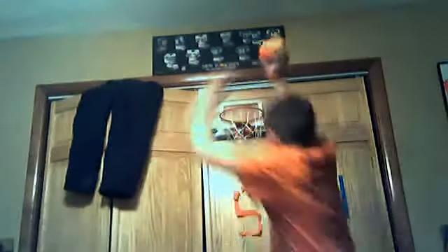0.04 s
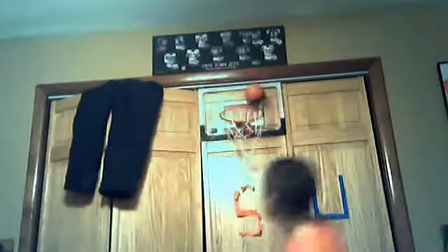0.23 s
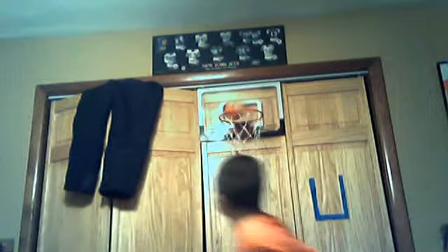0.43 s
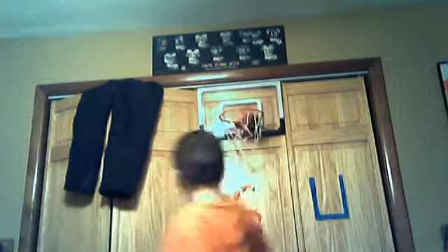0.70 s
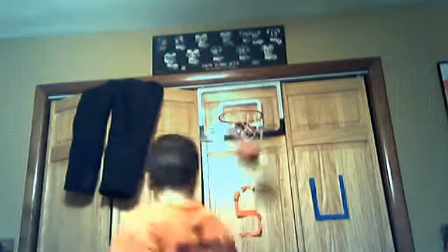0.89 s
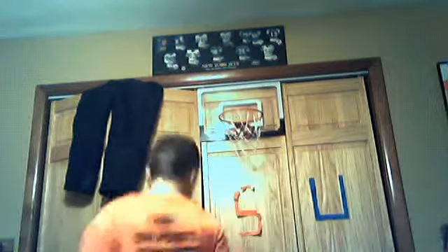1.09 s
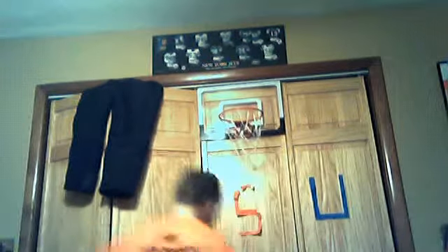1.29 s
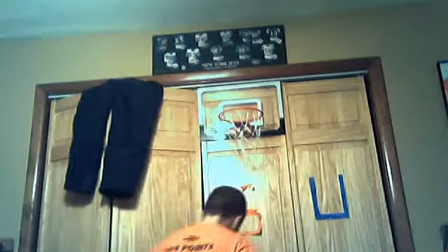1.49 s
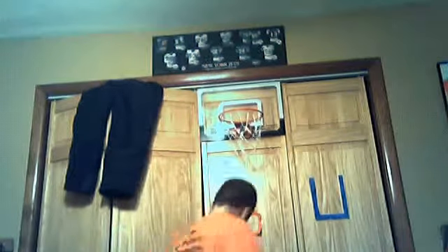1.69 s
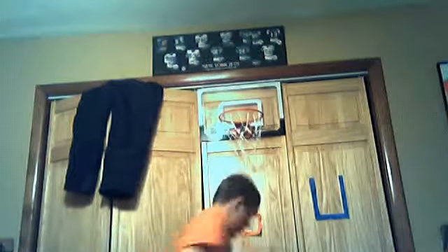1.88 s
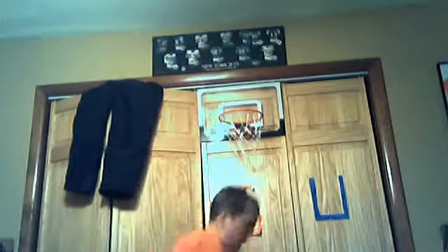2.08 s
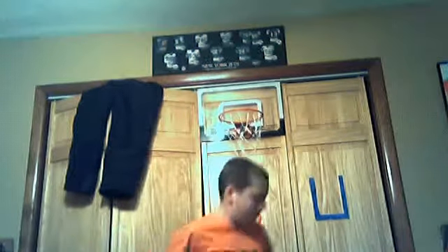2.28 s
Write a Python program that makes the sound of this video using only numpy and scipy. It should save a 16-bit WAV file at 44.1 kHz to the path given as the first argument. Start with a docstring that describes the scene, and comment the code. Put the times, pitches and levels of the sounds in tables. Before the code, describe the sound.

A loud bang comes first as a ball hits a backboard on a door, which rattles briefly with the loose rim. The net brushes faintly, then bounces and footsteps thud softly in a small room with a faint hum.

```python
"""First comes a bang: a small ball hits a mini hoop's backboard, the closet door behind it slams in its
frame and rattles, and the loose rim buzzes. The ball brushes through the net, then bounces and footsteps
thud softly on the floor of a small room. A faint hum lies under it all, and the microphone overloads
a little on the bang."""
import sys
import numpy as np
from scipy import signal
from scipy.fft import rfft, irfft
from scipy.io import wavfile

SR = 44100
rng = np.random.default_rng(int(sys.argv[2]) if len(sys.argv) > 2 else 0)


def transcribe(signal):
    """Save signal, clipped to [-1, 1], as a 16-bit WAV file at the path in sys.argv[1]."""
    frames = np.atleast_2d(signal).T
    limited = np.clip(frames, -1, 1)
    pcm = np.round(limited * 32767).astype(np.int16)
    wavfile.write(sys.argv[1], SR, pcm)


N = 108045
HIT_RISE_S = .0007  # how fast a ball or foot contact builds


def undb(db):
    """Turn decibels into a gain."""
    return 10 ** (np.asarray(db) / 20)


def unit(x):
    """Scale a sound to an average (rms) level of 1."""
    return x / np.sqrt(np.mean(x ** 2))


def on_log(hz, points):
    """Read between (Hz, value) points, giving each octave equal space."""
    pitches, values = np.array(points, float).T
    return np.interp(np.log(np.maximum(hz, 1)), np.log(pitches), values)


def colour(x, points):
    """Give a sound the tone of a (Hz, dB) curve; only the curve's shape counts."""
    gain = unit(undb(on_log(np.arange(N + 1) * SR / (2 * N), points)))
    cepstrum = irfft(np.log(gain))
    cepstrum[1:N] *= 2  # folded so that nothing sounds before its hit
    cepstrum[N + 1:] = 0
    return irfft(rfft(x, 2 * N) * np.exp(rfft(cepstrum)))[:N]


def band(x, centre_hz, half_width_hz):
    """A resonance: keep only the sound near one pitch."""
    edges = [centre_hz - half_width_hz, centre_hz + half_width_hz]
    return signal.sosfilt(signal.butter(2, edges, "bandpass", fs=SR, output="sos"), x)


def since(start):
    """Seconds since a moment, zero before it."""
    return np.maximum(np.arange(N) / SR - start, 0)


def fade(t, t60):
    """Die away by 60 dB in t60 seconds, the fade time."""
    return np.exp(-np.log(1000) * t / t60)


def swell(middle, half):
    """A smooth rise and fall, about a third as strong half seconds from its middle."""
    return np.exp(-((since(0) - middle) / half) ** 2)


def uneven(depth):
    """A gain that jumps about from one millisecond to the next."""
    steps = np.arange(0, N, SR // 1000)
    return np.exp(depth * np.interp(np.arange(N), steps, rng.standard_normal(len(steps))))


def burst(start, rise_s, t60, chatter=0):
    """A spray of tiny contacts that builds and dies, with energy 1; chatter roughens it."""
    t = since(start)
    spray = rng.standard_normal(N) * uneven(chatter) * (1 - np.exp(-t / rise_s)) * fade(t, t60)
    return spray / np.sqrt(np.sum(spray ** 2))


# The tone of the room's air. Each row: pitch in Hz, level in dB.
AIR_TONE = [(25, 1.5), (60, -7.5), (130, -11.5), (200, -10), (320, -15), (600, -17), (900, -17.5),
            (1800, -25.5), (3000, -31), (6800, -29), (8000, -36)]

def background(air_db=-70.5, hum_db=-66.5, hum_hz=90):
    """Quiet room air and a steady low hum."""
    air = unit(colour(rng.standard_normal(N), AIR_TONE))
    hum = np.sqrt(2) * np.sin(2 * np.pi * hum_hz * since(0))
    return undb(air_db) * air + undb(hum_db) * hum


# How long the room echoes. Each row: pitch in Hz, fade time in seconds.
ROOM_FADES = [(150, .42), (500, .27), (1200, .36), (2700, .39), (6000, .28)]

def room(x, build_s=.008):
    """The echo of a small room; the bass lingers longest."""
    t, hz = since(0), np.arange(N // 2 + 1) * SR / N
    noise, tail = rfft(rng.standard_normal(N)), 0
    for k, (_, t60) in enumerate(ROOM_FADES):
        share = on_log(hz, [(f, j == k) for j, (f, _) in enumerate(ROOM_FADES)])
        tail = tail + irfft(noise * share, N) * fade(t, t60)
    walls = signal.butter(2, (70, 5000), "bandpass", fs=SR, output="sos")  # the range they reflect
    tail = signal.sosfilt(walls, tail * (1 - np.exp(-t / build_s)))
    return signal.fftconvolve(x, tail / np.sqrt(np.sum(tail ** 2)))[:N]


# Faint scrapes. Each row: middle in seconds, half-length in seconds, level in dB.
SCUFFS = [(1.486, 0.042, -71.5), (1.616, 0.069, -72)]
# Their resonances. Each row: pitch in Hz, relative level in dB.
SCUFF_RINGS = [(1880, -0.5), (2200, -5), (2670, -7.5)]

def scuffs():
    """Two short grainy scrapes after the first bounce."""
    grains = rng.standard_normal(N) * uneven(.41)
    scrape = unit(sum(undb(db) * band(grains, hz, half_width_hz=96) for hz, db in SCUFF_RINGS))
    return scrape * sum(undb(db) * swell(middle, half) for middle, half, db in SCUFFS)


# Light brushes. Each row: middle and half-length in seconds, level in dB, pitch in Hz, width in octaves.
RUSTLES = [(0.812, 0.043, -61, 833, 0.89), (0.821, 0.053, -69, 5770, 0.46),
           (1.463, 0.0437, -76, 5900, 0.23), (1.677, 0.015, -69.5, 597, 0.18),
           (1.92, 0.084, -81.5, 1311, 0.57), (2.302, 0.086, -77.5, 1940, 0.2)]

def rustles():
    """Net, clothes and feet brush with a faint hiss."""
    out, hz = 0, np.arange(1, N // 2 + 2) * SR / N
    for middle, half, db, centre_hz, octaves in RUSTLES:
        tone = np.exp(-.5 * (np.log2(hz / centre_hz) / octaves) ** 2)
        hiss = unit(irfft(rfft(rng.standard_normal(N)) * tone, N))
        out = out + undb(db) * swell(middle, half) * hiss
    return out


# Shifts of weight. Each row: middle in seconds, half-length in seconds, level in dB.
WEIGHT_SHIFTS = [(0.18, 0.047, -45), (0.601, 0.1, -44.5), (0.873, 0.068, -39), (1.315, 0.015, -56),
                 (1.39, 0.073, -37), (2.221, 0.038, -37)]
# The rumble's tone. Each row: pitch in Hz, level in dB.
RUMBLE_TONE = [(15, -16.5), (27, 6.5), (45, -12.5), (65, -11.5), (130, -21), (300, -38.5), (1000, -79)]

def floor_rumble():
    """The floor rumbles deeply as weight shifts on it."""
    rumble = unit(colour(rng.standard_normal(N), RUMBLE_TONE))
    return rumble * sum(undb(db) * swell(middle, half) for middle, half, db in WEIGHT_SHIFTS)


# The notes of backboard and door. Each row: pitch in Hz, relative level in dB, fade time in seconds.
PANEL_NOTES = [(200, -23, .22), (260, -25, .18), (345, -25, .18), (510, -10, .17), (560, -7, .16),
               (587, -1.5, .19), (657, -8, .14), (711, -15, .16), (854, -16, .14), (955, -18, .14),
               (1100, -17, .13), (1510, -21, .12)]
# The loudest note shifts as the door presses on its frame and comes free.
# Each row: time in seconds, pitch in Hz.
PANEL_PITCH = [(.24, 630), (.243, 587), (.42, 587), (.44, 608)]

def panel_ring(blows, rise_s, gain_db=-3.5):
    """Backboard and door ring after each (seconds, dB) blow, sped up to that moment's pitch."""
    out, t = 0, since(0)
    loudest_hz = max(PANEL_NOTES, key=lambda note: note[1])[0]
    ring = sum(undb(db) * np.sin(2 * np.pi * hz * t) * fade(t, t60) for hz, db, t60 in PANEL_NOTES)
    ring *= 1 - np.exp(-t / rise_s)
    for start, db in blows:
        speed = np.interp(start, *np.transpose(PANEL_PITCH)) / loudest_hz
        out = out + undb(gain_db + db) * np.interp((t - start) * speed, t, ring, left=0)
    return out


# Bounces and footsteps. Each row: start in seconds, boom in dB, thump in dB, thump pitch in Hz,
# slap in dB, slap's treble limit in Hz, tick in dB, door ring in dB. Levels are relative.
THUDS = [(0.885, -53.5, -56.5, 198, -18, 850, -48, -77), (1.2954, -55, -54.5, 147, -19, 500, -51, -71.5),
         (1.3449, -21.5, -21.5, 172.8, 3, 460, -28, -40), (2.1631, -20, -37, 213, 6, 678, -32, -43)]
# The tones of the dull slap and the brighter tick. Each row: pitch in Hz, level in dB.
SLAP_TONE = [(100, 5), (300, -3.5), (560, 1.5), (680, -4), (840, -4.5), (1000, -9.5)]
TICK_TONE = [(300, -8), (1000, 11.5), (1700, 6.5), (2500, -4.5), (4000, -5), (6800, -4), (8000, -9.5)]

def thuds(boom_hz=89.45, boom_peak_s=.02, echo_db=-17):
    """A soft contact slaps and thumps, the floor's boom swells behind it, and the door rings faintly."""
    low, slaps, ticks = 0, 0, 0
    for start, boom_db, thump_db, thump_hz, slap_db, limit_hz, tick_db, _ in THUDS:
        t = since(start)
        age = t / boom_peak_s
        boom = (age * np.exp(1 - age)) ** 3.95  # a rounded pulse
        boom += undb(-6) * np.minimum(age, 1) * fade(t, .28)  # and its tail
        thump = (1 - np.exp(-t / HIT_RISE_S)) * fade(t, .156)
        low = low + undb(boom_db) * boom * np.sin(2 * np.pi * boom_hz * t)
        low = low + undb(thump_db) * thump * np.sin(2 * np.pi * thump_hz * t)
        soften = signal.butter(6, limit_hz, fs=SR, output="sos")
        slaps = slaps + undb(slap_db) * signal.sosfilt(soften, burst(start, HIT_RISE_S, t60=.15))
        ticks = ticks + undb(tick_db) * burst(start, HIT_RISE_S, t60=.31)
    ring = panel_ring([(start, db) for start, *_, db in THUDS], HIT_RISE_S)
    contact = colour(slaps, SLAP_TONE) + colour(ticks, TICK_TONE) + ring
    return low + contact + undb(echo_db) * room(contact)


# The metal rim's buzzing tone and its two resonances. Each row: pitch in Hz, level in dB.
BUZZ_TONE = [(400, -7), (1000, 10), (1600, 2.5), (2600, -6), (3400, -9), (4600, -2.5), (5500, -11.5),
             (7000, -8.5), (7500, -17.5)]
RIM_MODES = [(2550, 5), (4600, 2.9)]

def rim_buzz(start_s=.236, stop_s=.462, gain_db=-36, sag_db_per_s=-18):
    """The loose metal rim chatters while the door shakes, then comes to rest."""
    t = since(start_s)
    shake = (1 - np.exp(-t / .005)) * undb(gain_db + sag_db_per_s * t) * fade(since(stop_s), .17)
    grains = unit(rng.standard_normal(N) * np.exp(.5 * rng.standard_normal(N))) * shake
    ring = sum(undb(db) * band(grains, hz, half_width_hz=83) for hz, db in RIM_MODES)
    return colour(grains, BUZZ_TONE) + ring


def ball_smack():
    """The ball slaps the plastic face of the board."""
    hit = burst(start=.235, rise_s=HIT_RISE_S, t60=.25)
    return undb(14.5) * band(hit, centre_hz=1400, half_width_hz=420)


# The ball hits the board, then the door hits its frame.
# Each row: start in seconds, then the relative levels of ring, clack and low shudder in dB.
KNOCKS = [(.2192, -20, -23, -22), (.2302, -19, -15, -15), (.235, -9.5, -8, -8), (.2451, -23, -11.5, -11),
          (.2519, -1, -2, -6), (.2695, -6, -8, -6), (.2841, -12, -9.5, -9), (.3014, -12, -14, -13),
          (.3281, -12, -14, -14), (.347, -32, -17, -18), (.369, -18, -21, -13), (.3889, -17, -15, -13),
          (.4195, -26, -21, -9), (.4425, -18, -23, -12), (.4576, -16.5, -27, -15), (.4742, -22, -30, -14)]
# The tones of the clack and the shudder. Each row: pitch in Hz, level in dB.
CLACK_TONE = [(150, -16), (400, 3.5), (620, 14), (900, 5.5), (1400, 0.5), (2000, -5.5), (3100, -11.5),
              (4500, -9.5), (5600, -11), (7000, -8.5), (7400, -18)]
SHUDDER_TONE = [(20, -8.5), (45, 2), (70, -3.5), (130, -3), (210, 2.5), (330, -1), (600, -17.5),
                (2000, -59)]

def door_bang(clack_gain_db=17.5, shudder_gain_db=12.5, rattle_echo_db=-12.5, ring_echo_db=-23):
    """Each knock rings the panel, clacks against the frame and shakes the whole door."""
    ring = panel_ring([row[:2] for row in KNOCKS], rise_s=.0021)
    clack, shudder = 0, 0
    for start, _, clack_db, shudder_db in KNOCKS:
        clack = clack + undb(clack_gain_db + clack_db) * burst(start, .002, t60=.13, chatter=.35)
        shudder = shudder + undb(shudder_gain_db + shudder_db) * burst(start, .002, t60=.24)
    rattle = colour(clack, CLACK_TONE) + colour(shudder, SHUDDER_TONE) + rim_buzz() + ball_smack()
    return ring + rattle + room(undb(rattle_echo_db) * rattle + undb(ring_echo_db) * ring)


def scene():
    """All the sounds meet at one microphone."""
    return (door_bang() + thuds() + floor_rumble() + rustles() + scuffs() + background())[None]


def record(dry, treble_hz=8150, overload=.68, crackle_top_hz=15800):
    """The microphone passes little treble; the loudest peaks then clip and crackle above its range."""
    heard = signal.sosfilt(signal.ellip(10, .2, 70, treble_hz, fs=SR, output="sos"), dry)
    clipped = np.clip(heard, -overload, overload)
    return signal.sosfilt(signal.butter(20, crackle_top_hz, fs=SR, output="sos"), clipped)


dry = scene()
out = record(dry)
transcribe(out)
```